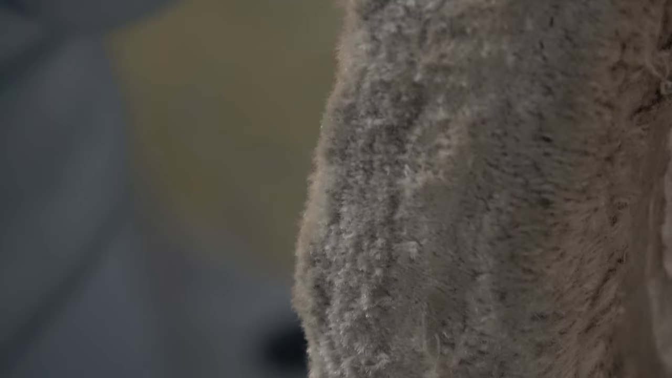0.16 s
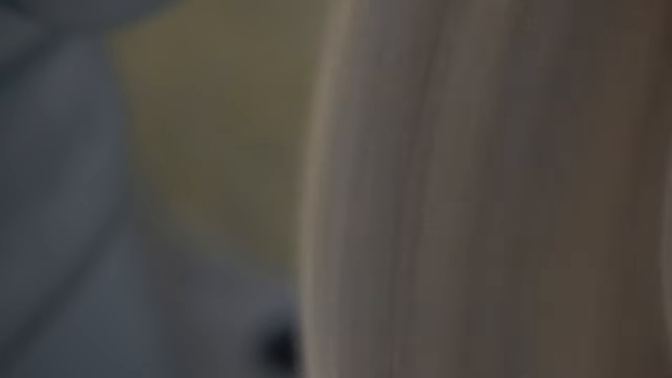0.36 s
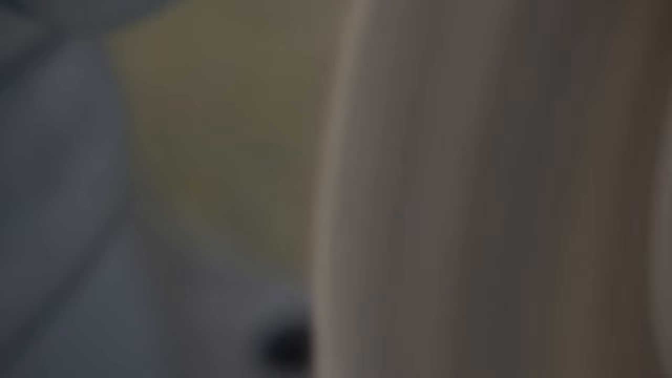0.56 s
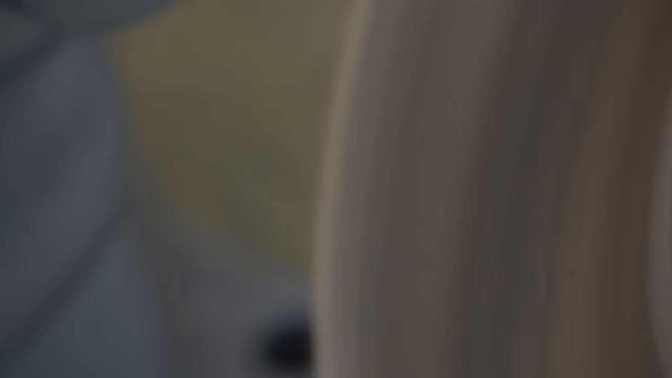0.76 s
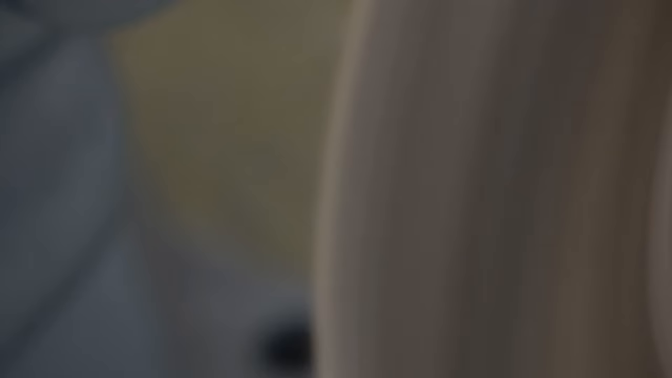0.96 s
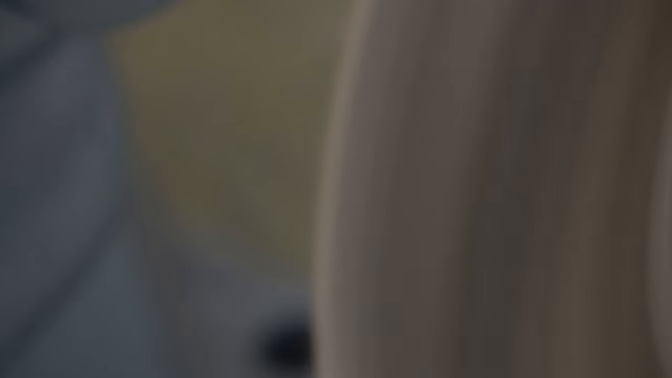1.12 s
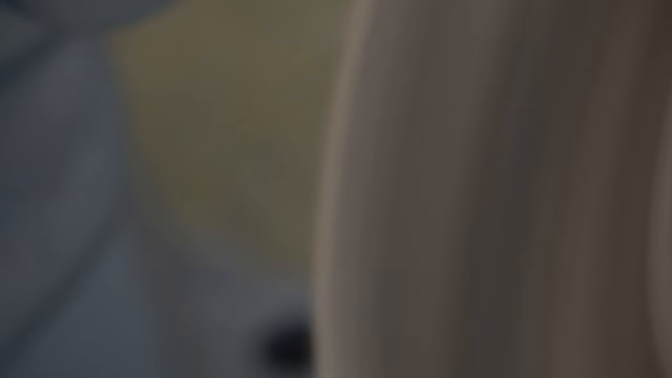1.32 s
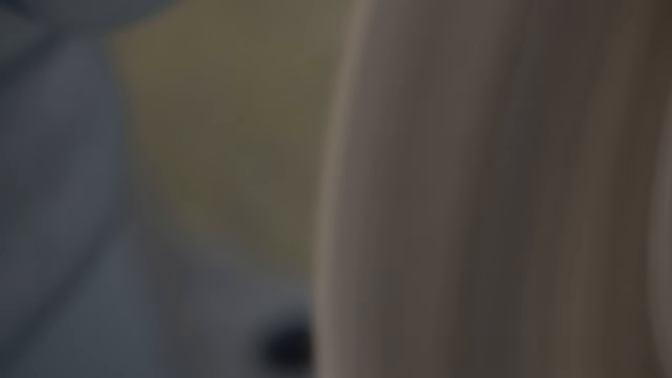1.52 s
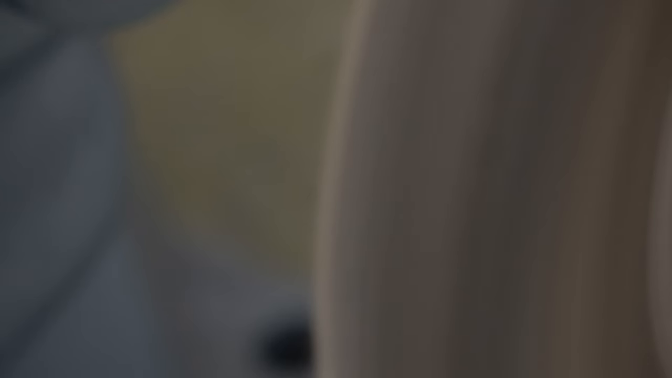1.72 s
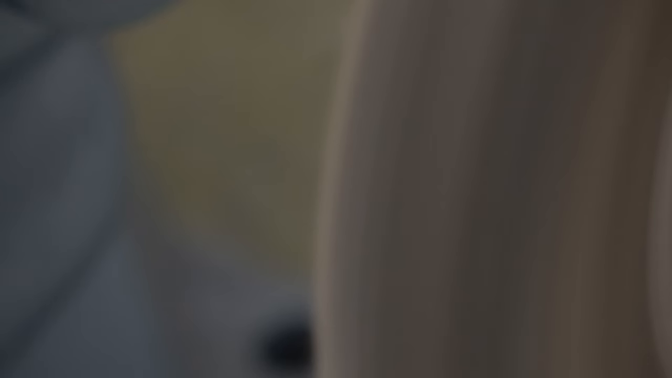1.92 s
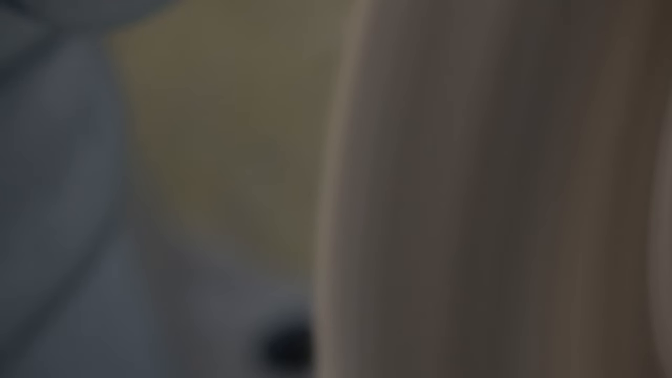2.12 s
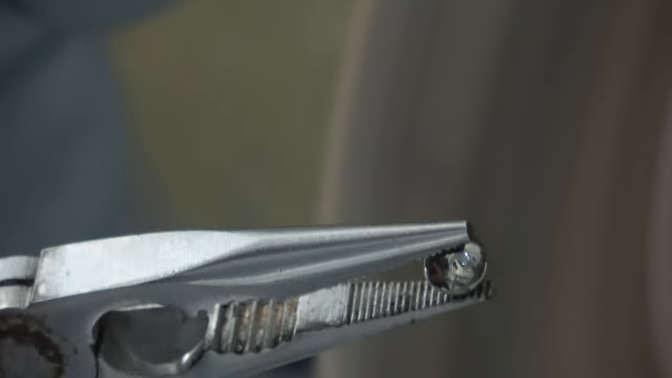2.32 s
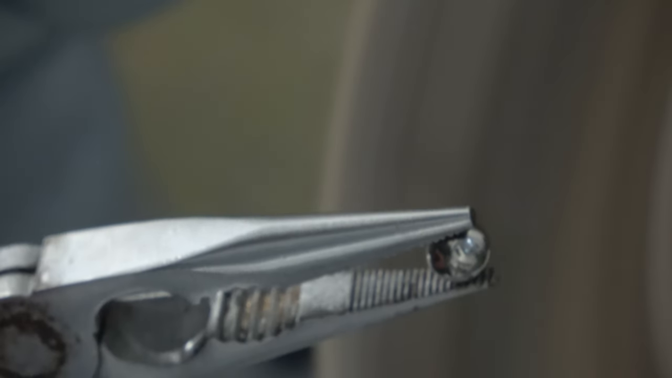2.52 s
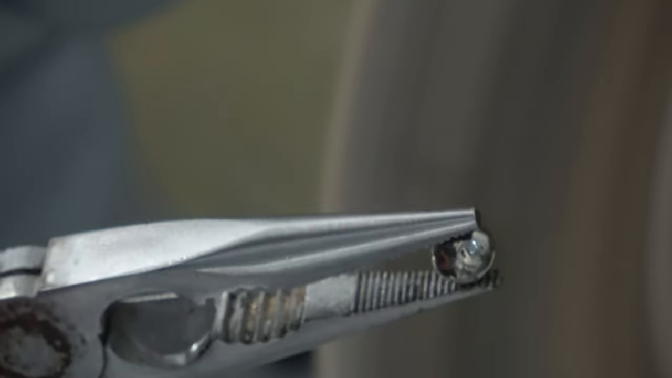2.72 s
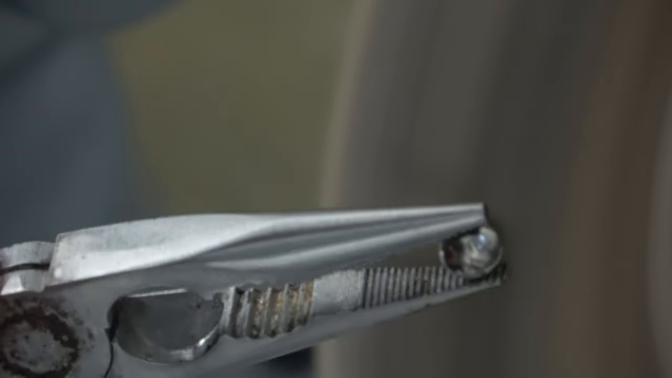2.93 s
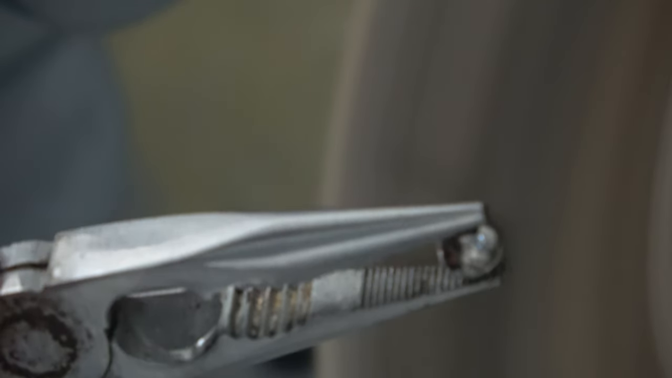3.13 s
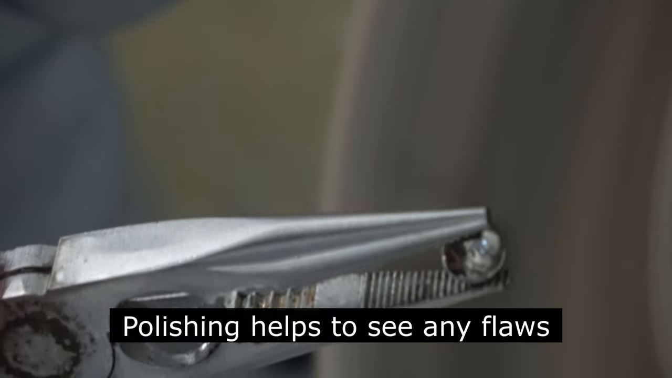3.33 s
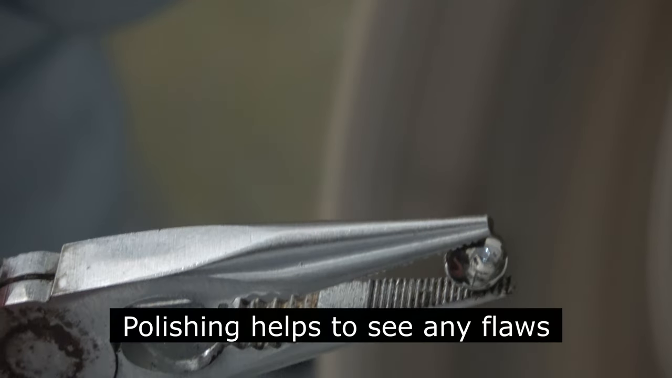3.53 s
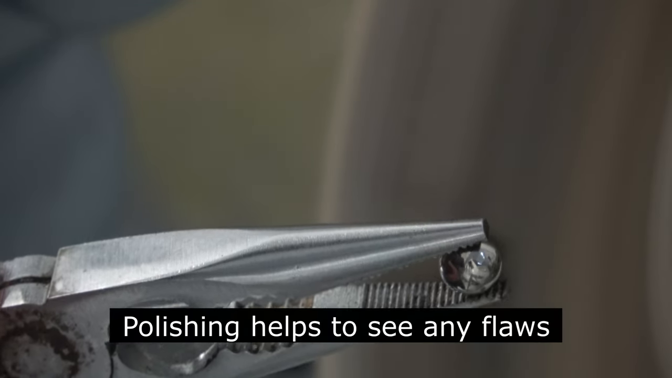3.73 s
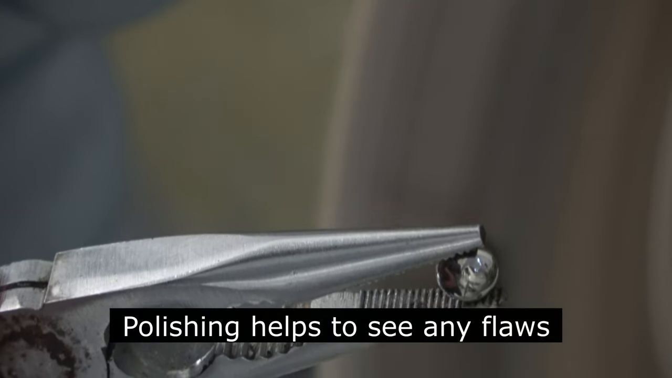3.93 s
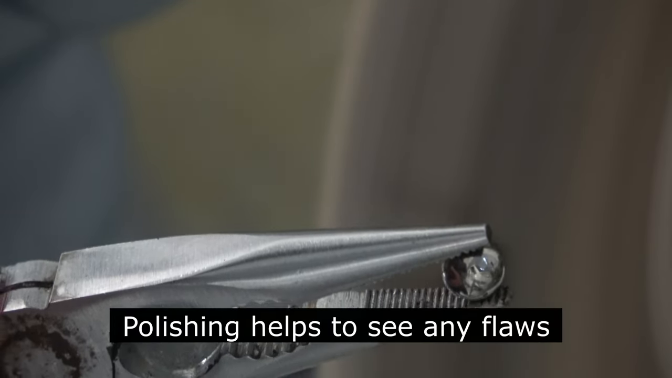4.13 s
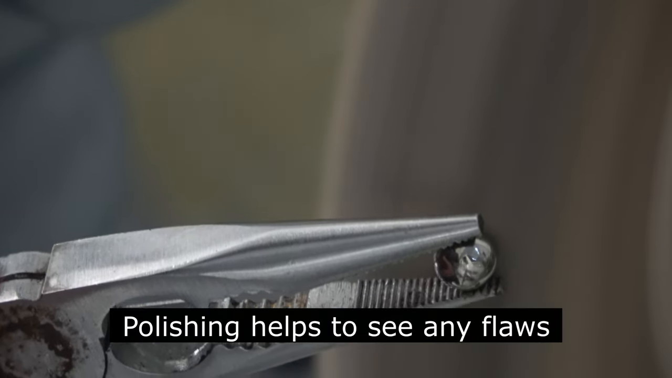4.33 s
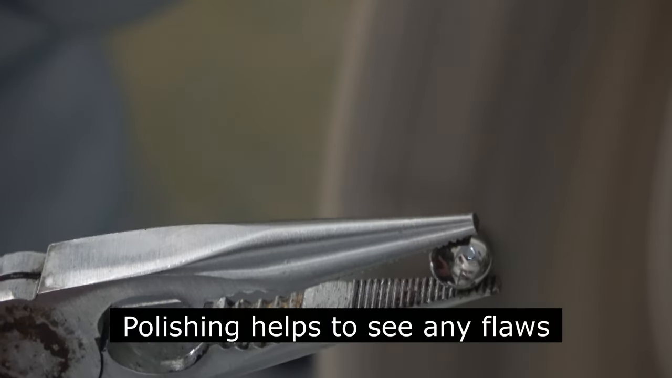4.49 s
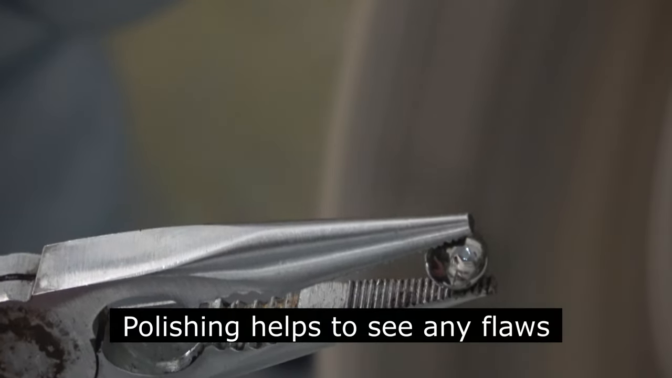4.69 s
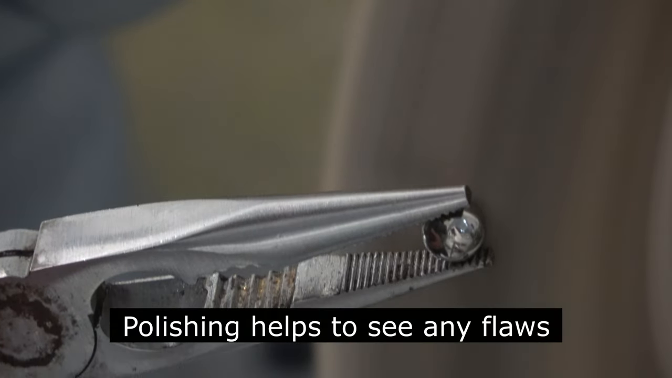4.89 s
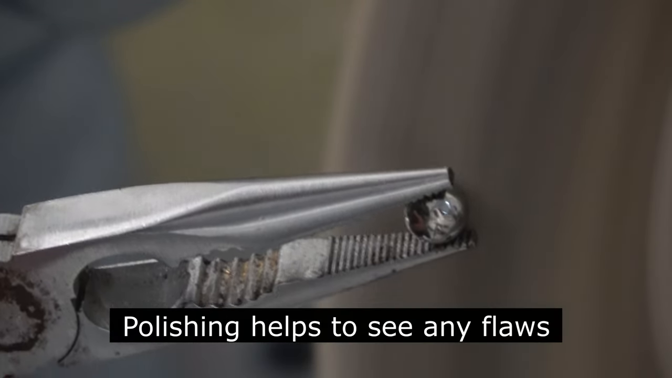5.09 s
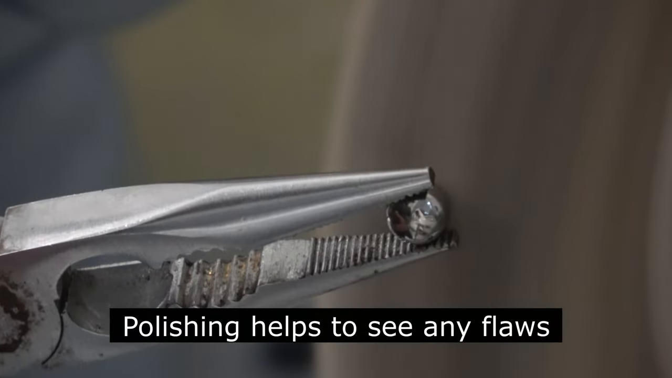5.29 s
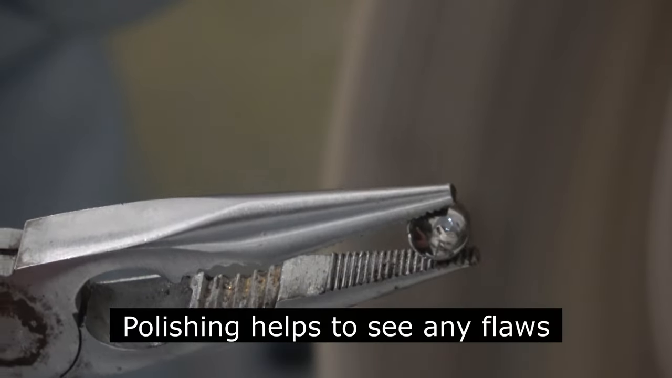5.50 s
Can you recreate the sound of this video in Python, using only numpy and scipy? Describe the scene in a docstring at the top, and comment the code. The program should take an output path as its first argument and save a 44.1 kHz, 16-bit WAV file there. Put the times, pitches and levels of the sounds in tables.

```python
"""A bench polisher starts in a quiet workshop: its motor growls and runs up in a third of a second.
Starting torque shakes the housing's resonances; at speed the unbalanced shaft hums and the rotor
slots add a thin whine. The cloth buffing wheel hisses as it drags through the air. A small steel
ball held in pliers is pressed on the wheel in several strokes: the same fibres rub it on every
turn, so the scratch buzzes and rings in the tool. A low throb joins as the work goes on."""
import sys
import numpy as np
from scipy import signal
from scipy.fft import rfft, irfft
from scipy.io import wavfile
from scipy.ndimage import uniform_filter1d, map_coordinates

SR = 44100
rng = np.random.default_rng(int(sys.argv[2]) if len(sys.argv) > 2 else 0)


def log_audio(samples):
    """Write samples as a 16-bit WAV file to the path given in sys.argv[1]."""
    # one column per channel
    frames = np.atleast_2d(samples).T
    # limit to full scale, then quantise
    limited = np.clip(frames, -1, 1)
    pcm = np.round(limited * 32767).astype(np.int16)
    wavfile.write(sys.argv[1], SR, pcm)


N = 244755

# Noise spectrum of the workshop: frequency_hz, relative_density_db
ROOM_SPECTRUM = [(20, 0), (45, 6), (70, -4), (120, -3.5), (300, -19), (780, -22.5), (1500, -25.5),
                 (2150, -26.5), (2700, -32), (4600, -27), (11000, -26.5), (13200, -19.5), (16000, -21.5)]
# Noise spectrum of the wheel's hiss: frequency_hz, relative_density_db
HISS_SPECTRUM = [(30, -31), (70, 4.5), (170, 4), (300, 4.5), (560, 0.5), (780, 3), (1200, -0.4),
                 (1700, -2.5), (4000, -3.5), (5500, -0.07), (8500, 2.5), (10500, 0), (13500, -1.5),
                 (16000, -12.5)]
# Stereo position of hiss and rattle: frequency_hz, left_minus_right_db
NOISE_PAN = [(60, 4), (170, 6), (380, -3), (700, -1), (1000, -1), (1290, -4), (1400, 0), (3300, 0),
             (5000, 2), (15000, 2)]
# Stereo width of the noise by band, nearly mono from 1.4 to 3 kHz: frequency_hz, side_minus_mid_db
NOISE_SPREAD = [(100, -22), (900, -17), (1280, -13), (1420, -36), (3000, -36), (4200, -16), (6000, -11.5),
                (15000, -11.5)]
# Noise spectrum of the wheel's rattle: frequency_hz, relative_density_db
RATTLE_SPECTRUM = [(30, -11), (55, 7), (110, -2), (300, 0.5), (650, -6), (900, -5), (1350, -3),
                   (1600, -13.5), (2200, -15.5), (3000, -25.5), (6000, -39), (16000, -62)]
# Strokes of the ball on the wheel: peak_s, relative_level_db, half_length_s
HAND_STROKES = [(2.975, -38, 0.12), (3.243, -38.5, 0.13), (3.86, -33, 0.17), (4.33, -36.5, 0.17),
                (4.493, -31, 0.086), (4.92, -37.5, .09), (5.067, -30, 0.097), (5.382, -36, 0.12)]
# Spectrum of cloth rubbing on steel: frequency_hz, relative_density_db
FRICTION_SPECTRUM = [(300, -1), (1000, -7.5), (1500, -5.5), (2000, -2.5), (2800, 1), (3300, 0), (4100, 1),
                     (4800, -0.5), (6500, -6.5), (9000, -4.5), (12000, -10), (16000, -29)]
# Modes of pliers and ball, relative to the scratch: pitch_hz, width_hz, first_grip_db, second_grip_db
TOOL_MODES = [(1990, 650, -20, -18), (3280, 190, -16, -23), (4060, 620, -25, -14), (6400, 2600, -11, -8.5)]
# Switch clicks and starting knocks: start_s, level_db, pitch_hz, width_hz, decay_s
START_IMPACTS = [(0.358, -55, 1190, 2000, 0.0055), (.373, -54, 8000, 2500, .008),
                 (.374, -38, 446, 200, 0.0056), (0.423, -34.5, 55, 60, .02), (.46, -30, 1970, 500, 0.0062),
                 (0.459, -38, 3600, 900, 0.0032), (.586, -20, 460, 130, 0.0083),
                 (.745, -29.5, 453, 80, .012)]
# Modes of the housing: pitch_hz, width_hz, run_up_gain_db, at_speed_gain_db, left_minus_right_db
HOUSING_MODES = [(222.4, 25.3, -8, -34, -1), (396.6, 42, -7.5, -5.5, -7), (442.7, 32.6, 2, 0.5, -6.5),
                 (492, 76, -9.5, -10, -3)]
# Partials of the whine: multiple_of_shaft_speed, relative_level_db, left_minus_right_db
WHINE_PARTIALS = [(23, -15, -50), (25, -16, 7), (26, -2, -9), (28, -15, -12)]
# Envelope of the whine at speed: time_s, relative_level_db
WHINE_ENVELOPE = [(0.8, -47.5), (1.06, -54.5), (1.48, -45.5), (2.1, -49.5), (3.29, -43), (3.59, -48.5),
                  (4.1, -43), (4.81, -48), (5.5, -43.5)]
# Harmonics of the hum: multiple_of_shaft_speed, free_level_db, work_level_db, left_minus_right_db
SHAFT_HARMONICS = [(1, -35.5, -35.5, 4), (2, -44.5, -43.5, 1.5), (3, -28.5, -32.5, 7), (4, -47, -46.5, -5),
                   (5, -43, -49, 2), (6, -49.5, -54.5, -6), (7, -48, -52, 0)]

FULL_SPEED_HZ = 49.51   # shaft turns per second
SWITCH_ON_S, WORK_START_S = 0.372, 2.33
TOUCH_S, SETTLE_S = 2.5, 0.24   # the ball meets the wheel and settles on it


def from_db(db):
    """Amplitude ratio of a level in decibels."""
    return np.exp(np.asarray(db) * np.log(10) / 20)


def unit_rms(x):
    """Normalisation to an rms of 1."""
    return x / np.sqrt(np.mean(x ** 2) + 1e-20)


def onset(midpoint_s, rise_s):
    """A smooth step from 0 to 1."""
    return .5 + .5 * np.tanh(2 * (np.arange(N) / SR - midpoint_s) / rise_s)


def at_bins(points):
    """Interpolation of a table over log frequency, at every Fourier bin."""
    hz, value = np.transpose(points)
    return np.interp(np.log(np.arange(N // 2 + 1) * SR / N + 1), np.log(hz), value)


def pan(db):
    """Level-difference panning: left and right gains whose mean is 1."""
    gains = from_db(np.array([[.5], [-.5]]) * db)
    return gains / gains.mean(axis=0)


def drift(rate_hz):
    """Random modulation of rms 1: a smooth curve through random points."""
    knots = rng.standard_normal(4000)
    coarse = np.arange(0, N, 32)
    curve = map_coordinates(knots, [coarse / SR * rate_hz], mode="wrap")
    return np.interp(np.arange(N), coarse, unit_rms(curve))


def stereo_noise(spectrum, pan_db, spread_db):
    """Partly coherent coloured noise: the channels share a mid part and take a side part in antiphase."""
    mid, side = rfft(rng.standard_normal((2, N)))
    channels = mid + from_db(spread_db) * side * [[1], [-1]]
    return unit_rms(irfft(channels * from_db(at_bins(spectrum)) * pan(pan_db), N))


def resonate(x, hz, width_hz):
    """Two equal resonators in cascade, for steep skirts."""
    radius = np.exp(-np.pi * width_hz / SR)
    section = [1 - radius, 0, radius - 1, 1, -2 * radius * np.cos(2 * np.pi * hz / SR), radius * radius]
    return signal.sosfilt([section, section], x)


def tone(cycles):
    """A sinusoid of rms 1 and random phase that follows a count of cycles."""
    return np.sqrt(2) * np.sin(2 * np.pi * (cycles + rng.random()))


def workshop(level_db=-52):
    """Stationary broadband noise forms the background of the room."""
    return from_db(level_db) * stereo_noise(ROOM_SPECTRUM, pan_db=2.0, spread_db=-10.5)


def throb(start_s=4, pitch_hz=85.4, level_db=-49, octave_db=-2.0):
    """Beating: a low wavering tone and its octave interfere with the hum."""
    cycles = pitch_hz * np.arange(N) / SR + 0.056 * drift(4.7)
    strength = onset(start_s, rise_s=.4) * from_db(level_db + drift(11))
    return pan(4.2) * strength * (tone(cycles) + from_db(octave_db) * tone(2 * cycles))


def wheel_hiss(pace, working, ceiling_db=-30.5, work_change_db=-0.5, half_swell_pace=0.65):
    """Turbulence: cloth fibres tear through the air, louder and brighter as the rim gathers speed."""
    drag = (pace / half_swell_pace) ** 4.6
    flutter_db = 0.28 * drift(60)
    strength = drag / (1 + drag) * from_db(ceiling_db + work_change_db * working + flutter_db)
    bright = stereo_noise(HISS_SPECTRUM, at_bins(NOISE_PAN), at_bins(NOISE_SPREAD))
    dull = signal.sosfiltfilt(signal.butter(1, 5000, fs=SR, output="sos"), bright)
    return strength * (dull + pace ** 4.1 * (bright - dull))


def wheel_rattle(slip, full_slip_db=-31.5):
    """Contact noise: the wheel and its flanges rattle while the shaft accelerates."""
    strength = onset(0.433, rise_s=0.031) * slip ** 0.27
    roughness_db = 1.8 * drift(160)
    noise = stereo_noise(RATTLE_SPECTRUM, at_bins(NOISE_PAN), at_bins(NOISE_SPREAD))
    return strength * from_db(full_slip_db + roughness_db) * noise


def hand_pressure(touch_db=-52):
    """Pressure as a rubbing level in dB: a light touch and bell-shaped strokes add in power."""
    t = np.arange(N) / SR
    swells = [from_db(db) * np.exp(-((t - peak_s) / half_s) ** 2) for peak_s, db, half_s in HAND_STROKES]
    touch = from_db(touch_db) * onset(TOUCH_S, SETTLE_S)
    return 10 * np.log10(touch ** 2 + np.sum(np.square(swells), axis=0) + 1e-20)


def pliers_ring(scratch, pressure_db, damping=0.22, medium_pressure_db=-35.0, regrip_s=4.95):
    """Contact damping: the tool rings most freely under a light touch; the grip weights its modes."""
    regripped = onset(regrip_s, rise_s=.2)
    modes = 0
    for hz, width_hz, first_db, second_db in TOOL_MODES:
        gain = from_db(first_db + (second_db - first_db) * regripped)
        modes = modes + gain * unit_rms(resonate(scratch, hz, width_hz))
    freedom_db = np.clip(damping * (medium_pressure_db - pressure_db), -6, 3)
    return from_db(freedom_db) * modes


def ball_friction(turns, tuft_db=2.5, wear_rate_hz=2.23, fresh_noise_db=-9.5):
    """Periodic friction: the same fibres pass the ball each turn and buzz, as the cloth slowly shifts."""
    rim_points = int(SR / FULL_SPEED_HZ)
    around = np.arange(rim_points) / rim_points
    tufts = np.interp(around, np.linspace(0, 1, 30), rng.standard_normal(30))
    high_spot_db = 5 * np.exp(-((around - .5) / .06) ** 2)   # one spot on the rim bites harder
    relief = from_db(tuft_db * tufts + high_spot_db)
    fibres = rng.standard_normal((40, rim_points))
    place = (turns % 1 * rim_points).astype(int)
    # one lie of the fibres fades into the next at constant power
    blend, lie = np.modf(np.arange(N) / SR * wear_rate_hz)
    lie, angle = lie.astype(int), np.pi / 2 * blend
    repeating = np.cos(angle) * fibres[lie, place] + np.sin(angle) * fibres[lie + 1, place]
    scratch = (repeating + from_db(fresh_noise_db) * rng.standard_normal(N)) * relief[place]
    direct = unit_rms(irfft(rfft(scratch) * from_db(at_bins(FRICTION_SPECTRUM)), N))
    pressure_db = hand_pressure()
    return from_db(pressure_db) * (direct + pliers_ring(scratch, pressure_db))


def start_clicks():
    """Impact excitation: the switch and slack being taken up give bursts, each ringing in its own band."""
    out, age = np.zeros(N), np.arange(SR // 5) / SR
    for start_s, db, hz, width_hz, decay_s in START_IMPACTS:
        decay_s = abs(decay_s)
        burst = resonate(rng.standard_normal(len(age)) * np.exp(-age / decay_s), hz, width_hz)
        energy_gain = np.sqrt(decay_s * SR / 2 / np.sum(burst ** 2))
        start = int(start_s * SR)
        out[start:start + len(age)] += from_db(db) * energy_gain * burst
    return out


def shaft_speed(spin_up_hz_per_s=132, torque_growth_per_s=2.3, knee=10):
    """Induction: torque grows with speed, then gives out just under the mains rate; turns per second."""
    age = np.maximum(np.arange(N) / SR - SWITCH_ON_S, 0)
    unchecked_hz = spin_up_hz_per_s / torque_growth_per_s * np.expm1(torque_growth_per_s * age)
    return unchecked_hz / (1 + (unchecked_hz / FULL_SPEED_HZ) ** knee) ** (1 / knee)


def slot_whine(turns, slip, at_speed, full_slip_db=-28.0):
    """Slot passing: rotor slots sweep the stator and give a thin tone, torn by judder in the run-up."""
    envelope_db = np.interp(np.arange(N) / SR, *np.transpose(WHINE_ENVELOPE))
    starting = from_db(full_slip_db) * slip ** 0.45
    strength = onset(0.432, rise_s=0.056) * np.hypot(starting, from_db(envelope_db + 3.5))
    jitter_cycles, judder_cycles = 0.018, .22 * (1 - at_speed)
    partials = 0
    for order, db, pan_db in WHINE_PARTIALS:
        cycles = round(order) * turns + jitter_cycles * drift(50) + judder_cycles * drift(170)
        flutter_db = 0.3 * drift(35)
        partials = partials + pan(pan_db) * from_db(db + flutter_db) * tone(cycles)
    return strength * partials


def housing_drive(slip, full_slip_db=-18.5, free_db=-41.5, work_db=-38):
    """Forcing amplitude: large while the rotor slips, small running free, a little more under the ball."""
    # the motor first strains quietly, then the whole machine judders
    strain = from_db(-13.5) * onset(SWITCH_ON_S + 0.0074, rise_s=0.0074)
    judder = onset(0.441, rise_s=.028)
    starting = from_db(full_slip_db) * np.maximum(strain, judder) * slip ** .65
    steady_db = free_db + (work_db - free_db) * onset(TOUCH_S, SETTLE_S)
    return np.hypot(starting, from_db(steady_db) * (1 - slip))


def housing_growl(slip, at_speed, evenness=0.16):
    """Forced resonance: starting torque, then bearings and wheel, excite the modes of the housing."""
    modes = 0
    for hz, width_hz, run_up_db, at_speed_db, pan_db in HOUSING_MODES:
        # each resonator is widened, since the cascade narrows the band
        ring = unit_rms(resonate(rng.standard_normal(N), hz, 1.52 * width_hz))
        # the hard drive of the run-up keeps the ringing even; at speed it comes and goes
        envelope = np.sqrt(uniform_filter1d(np.abs(signal.hilbert(ring)) ** 2 / 2, size=400))
        driven = from_db(run_up_db) * ring / envelope
        loose = from_db(at_speed_db) * unit_rms(ring / envelope ** evenness)
        modes = modes + pan(pan_db) * (driven * (1 - at_speed) + loose * at_speed)
    return housing_drive(slip) * modes


def shaft_hum(turns, pace, working, build_up_s=0.027):
    """Rotating unbalance: the shaft shakes the bench in harmonics, strongly only close to full speed."""
    phase_jump_turns = working / 6   # the hum's phase jumps at 2.33 s, a soft bump like a splice
    harmonics = 0
    for row, (order, free_db, work_db, pan_db) in enumerate(SHAFT_HARMONICS):
        waver_db = (0.2 if row in (0, 2) else 0.6) * drift(14)   # the two strongest waver least
        level_db = free_db + (work_db - free_db) * working + waver_db
        cycles = round(order) * (turns + phase_jump_turns)
        harmonics = harmonics + pan(pan_db) * from_db(level_db) * tone(cycles)
    pole = np.exp(-1 / (build_up_s * SR))   # the bench takes a few cycles to swing up
    return harmonics * signal.lfilter([1 - pole], [1, -pole], pace ** 60)


def scene():
    """Superposition: one shaft drives the sounds of motor and wheel, over the noise of the room."""
    speed_hz = shaft_speed()
    turns = np.cumsum(speed_hz) / SR
    pace = speed_hz / FULL_SPEED_HZ
    slip = np.maximum(1 - pace, 0)   # 1 at rest, 0 at full speed
    working = uniform_filter1d(1. * (np.arange(N) / SR > WORK_START_S), size=400)
    at_speed = uniform_filter1d(1. * (pace > .97), size=2000)
    motor = shaft_hum(turns, pace, working) + slot_whine(turns, slip, at_speed)
    motor += housing_growl(slip, at_speed)
    clatter = wheel_rattle(slip) + start_clicks()
    wheel = wheel_hiss(pace, working) + ball_friction(turns) + throb()
    return motor + clatter + wheel + workshop()


def record(dry, cutoff_hz=15900):
    """Band limiting: a steep elliptic low-pass removes the highest treble."""
    return signal.sosfilt(signal.ellip(12, .1, 90, cutoff_hz, fs=SR, output="sos"), dry)


dry = scene()
out = record(dry)
log_audio(out)
```